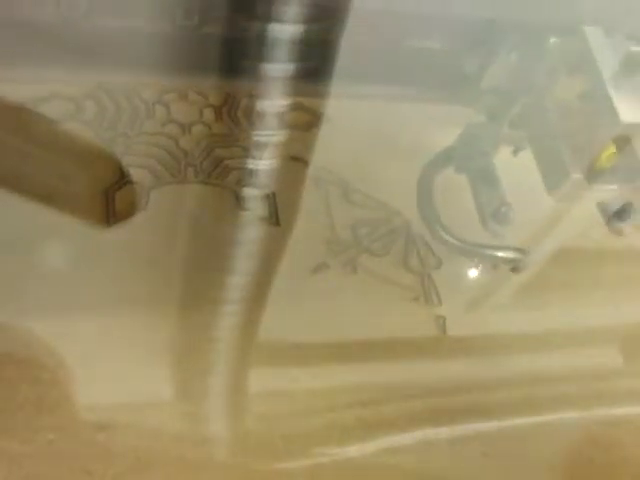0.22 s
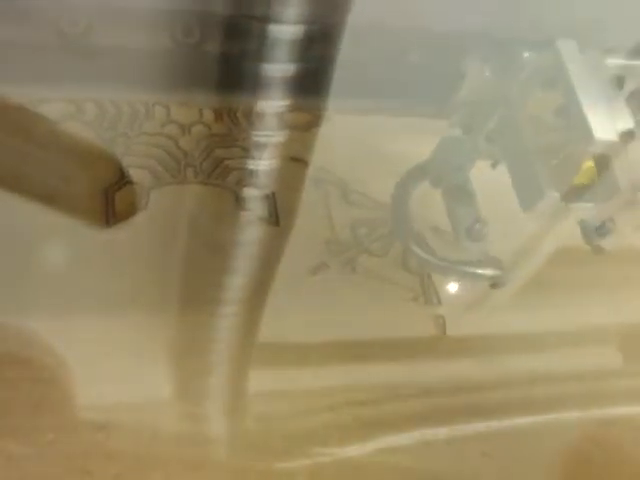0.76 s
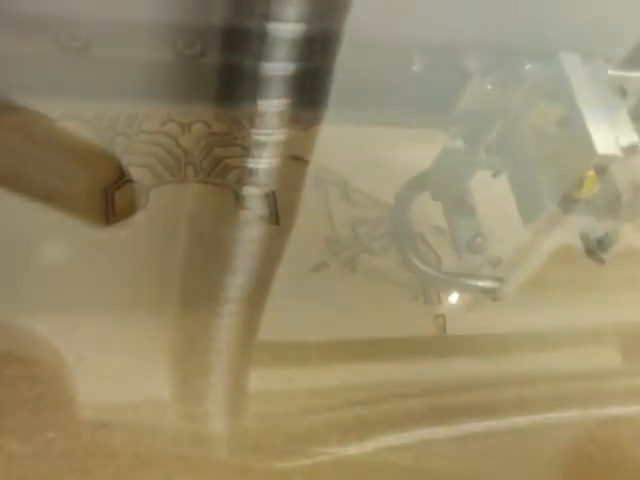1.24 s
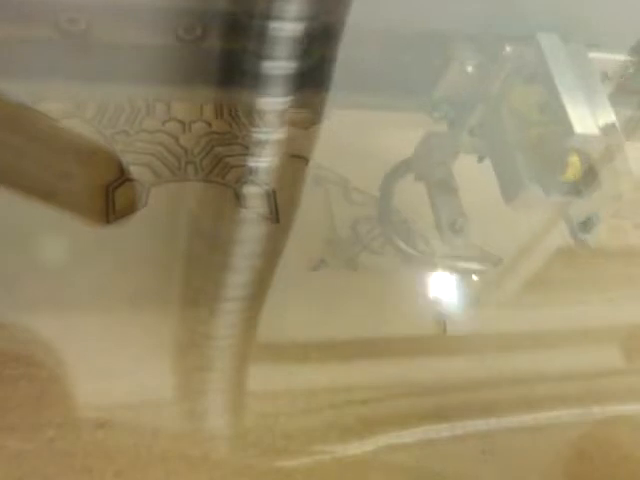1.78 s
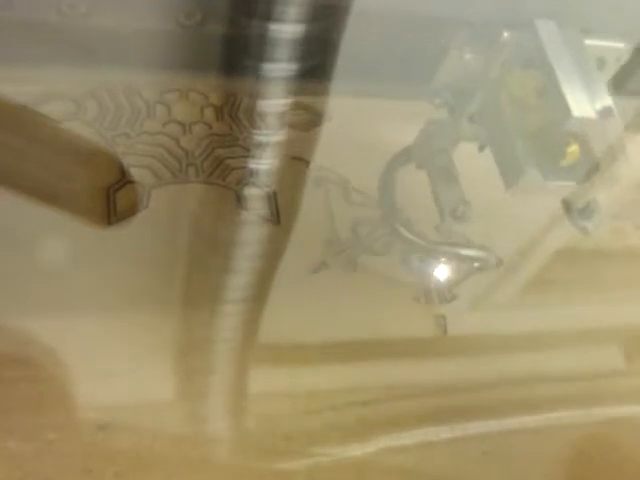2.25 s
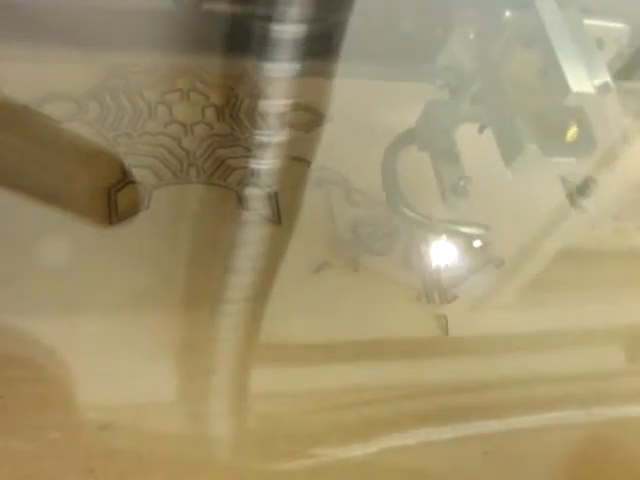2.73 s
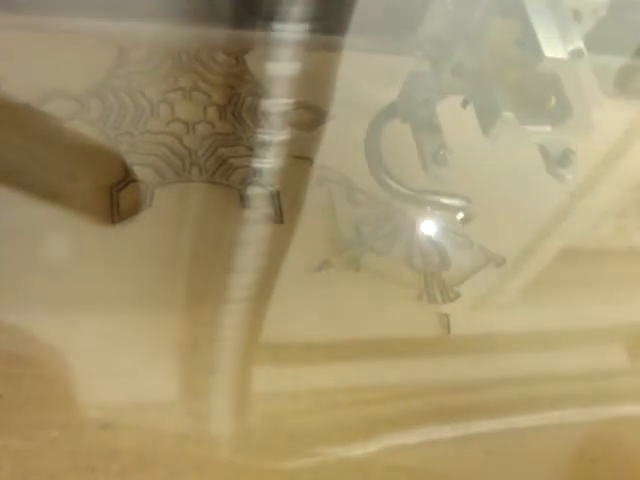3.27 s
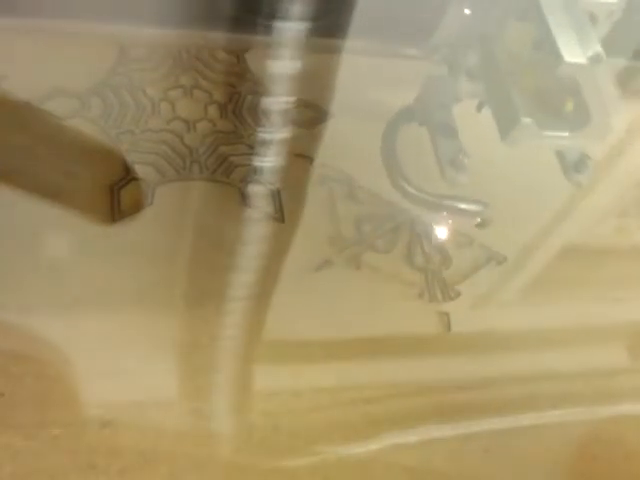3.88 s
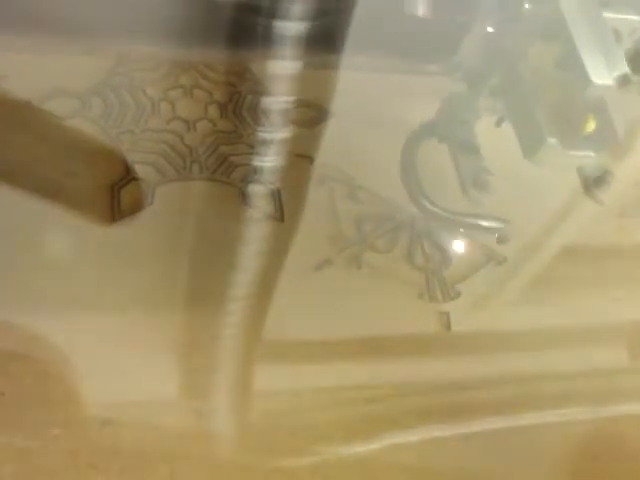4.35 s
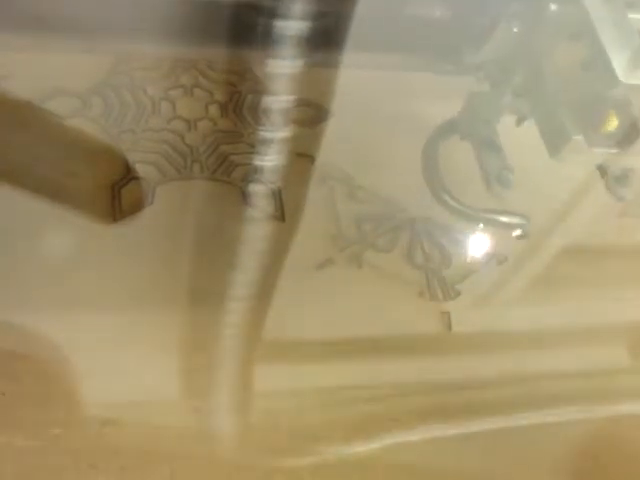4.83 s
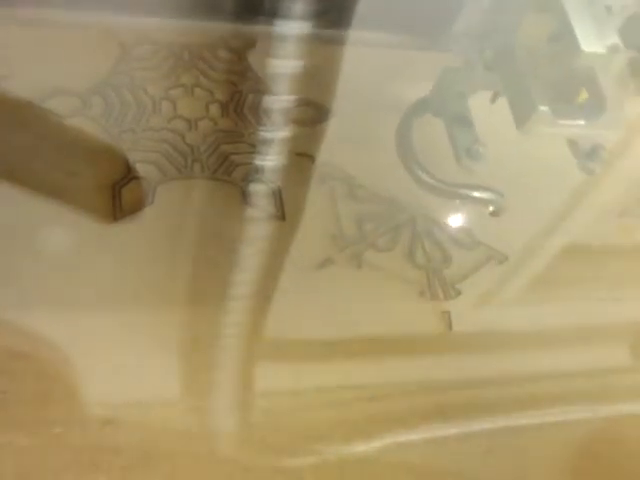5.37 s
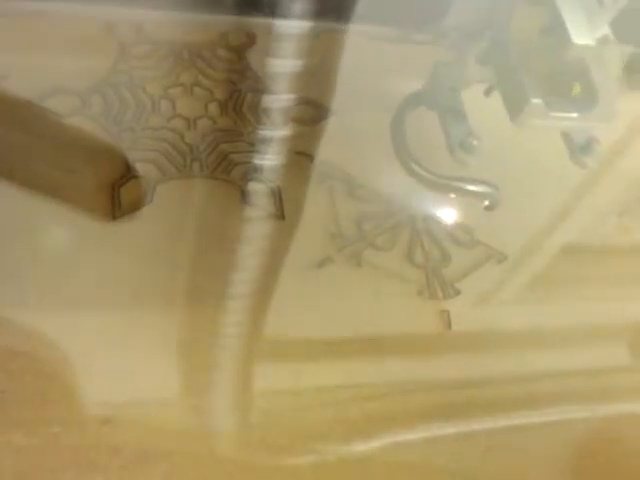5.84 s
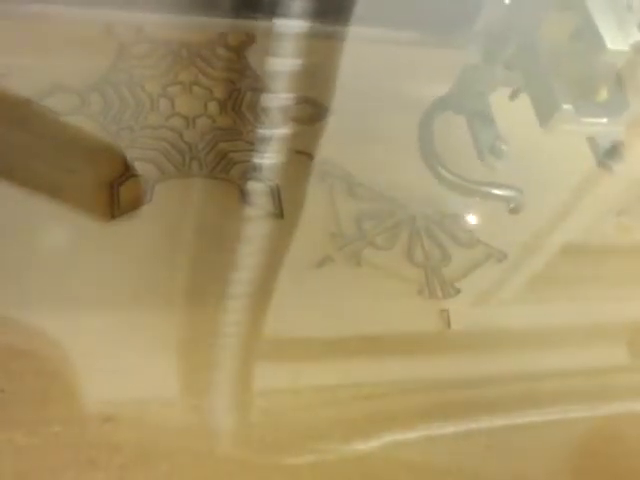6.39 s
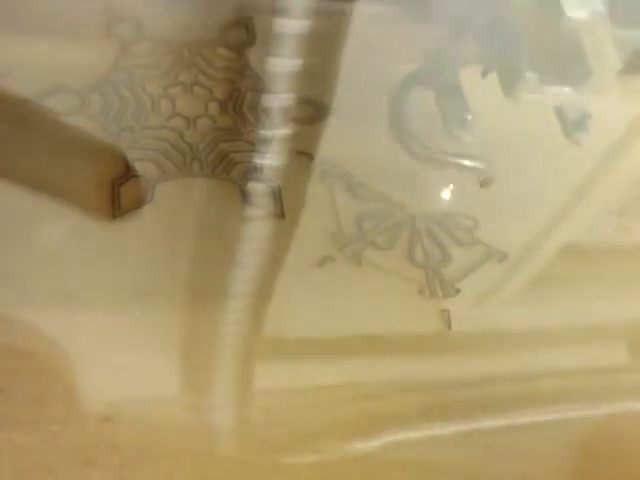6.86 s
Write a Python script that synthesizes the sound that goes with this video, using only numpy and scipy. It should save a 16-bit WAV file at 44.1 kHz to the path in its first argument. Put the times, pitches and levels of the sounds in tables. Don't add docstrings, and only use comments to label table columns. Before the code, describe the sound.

Continuous machine exhaust roar with a hollow hose boom, faint fan whine, brief motor tones and one tiny tick.

```python
import sys
import numpy as np
from scipy import signal
from scipy.fft import rfft, irfft, dct, next_fast_len
from scipy.io import wavfile
from scipy.ndimage import uniform_filter1d, map_coordinates

SR = 44100
rng = np.random.default_rng(int(sys.argv[2]) if len(sys.argv) > 2 else 0)


def level_to_linear(level):
    exponent = np.asarray(level, float) / 20
    return 10 ** exponent


def transcribe(u):
    v = np.clip(np.atleast_2d(u).T, -1, 1)
    q = np.round(v * 32767).astype(np.int16)
    wavfile.write(sys.argv[1], SR, q)


N = 313727

# frequency [Hz], density [dB per Hz].
TURBULENCE = [(15, -50), (25, -38), (180, -18), (301, -14.5), (365, -8.5), (482, -10.5), (623, -7),
              (709, -7), (789, -8.5), (1470, -7), (2680, -6.5), (3180, -8), (4200, -7.5), (5460, -12),
              (9240, -120)]
# centre [Hz], width [Hz], lift [dB].
DUCT_MODES = [(120, 62, 6), (177, 16, -4), (213, 41, 7), (241, 12, -3.5), (604, 10, -5.5), (646, 79, 5),
              (694, 30, 2.5), (718.5, 22, -7), (759, 49, 6), (820, 46, 4.5), (890, 24, 4.5), (941, 31, 4.5),
              (1039, 44, 3), (1283, 120, 2.5), (1360, 55, 0.5), (1792, 80, 3.5), (2700, 92, -2),
              (2930, 250, 3), (3065, 30, 1.5), (3440, 60, 1), (3114, 26, 5.5), (3194, 70, 4),
              (3330, 78, 4.5)]
# centre [Hz], width [Hz], level [dB].
HOSE_MODES = [(255, 24, -11), (287.2, 22, 1.5), (305.4, 7, -5), (313.5, 15, 2.5), (336, 16, -10.5)]
# time [s], level over its mean [dB].
HOSE_SWELL_DB = [(0, -0.5), (.3, 1.5), (.7, -2), (1.3, 0.5), (1.65, -3.5), (2.4, -3), (2.75, 3.5),
                 (3.15, -1), (3.7, 0), (4.3, 0.5), (4.85, 2), (5.2, -3), (5.45, 0), (5.75, 3), (6.1, -2),
                 (6.35, -1), (6.601, 1), (7.11, -1)]
# start [s], end [s], step rate at start [Hz], step rate at end [Hz],
# level of the double [dB].
GANTRY_MOVES = [
    (.06, 1.02, 343, 341.5, -37),
    (1.02, 1.98, 323, 320.5, -39),
    (2.62, 3.02, 322, 318, -37),
    (1.204, 1.472, 240, 238, -46),
    (3.753, 4.7, 266, 264.6, -40.5),
    (5.47, 5.72, 180, 184, -40),
    (6.71, 6.9, 300, 232, -36),
    (6.93, 7.2, 378, 382, -39),
]
# start [s], end [s], step rate at start [Hz], step rate at end [Hz],
# level of the double [dB].
CARRIAGE_MOVES = [(0, .3, 385, 383, -40), (0, .26, 408, 413, -41), (1.572, 1.76, 105.9, 101, -42.5),
                  (1.68, 1.79, 333, 342, -35), (1.72, 2.16, 342, 339.5, -31),
                  (2.08, 2.42, 339.5, 331, -35.5), (2.266, 2.52, 68.3, 68, -51),
                  (4.62, 4.876, 68.6, 65, -54), (4.923, 5.123, 258, 265, -41), (5.26, 5.44, 201, 190, -38),
                  (.5, 1.1, 402, 405, -42), (2.28, 2.62, 398, 417, -40), (3.9, 4.12, 386, 378, -40),
                  (5.88, 6.12, 387, 380, -39)]
ROTOR_RATES_HZ = [619.1, 642.8, 551.3, 580.3, 544.4, 44.8, 2115, 762, 803, 832, 3190]
# (multiple of the #
# base rate, level [dB rms]).
ROTOR_WHINES = [(.09, 1.8, [(1, -39.5), (2, -47), (3, -53), (4, -46), (5, -38.5), (6, -52)]),
                (.17, 3, [(1, -46), (2, -43.5), (3, -45.5), (4, -51), (5, -50)]), (.22, 1.5, [(1, -40.5),
                (4, -50), (6, -50)]), (.08, 4, [(1, -51), (2, -45.5)]), (.1, 4, [(2, -48), (3, -45)]),
                (.9, 4, [(1, -68), (2, -66), (3, -60)]), (.25, 4, [(1, -49)]), (.6, 4, [(1, -46)]),
                (.7, 4, [(1, -44)]), (.5, 5, [(1, -45)]), (.4, 3, [(1, -46)])]
# frequency [Hz], gain [dB].
TREBLE_LOSS = [(4000, 2.5), (4300, 0), (4700, -9.5), (4850, -8), (5150, -14.5), (5270, -15), (5400, -18.5),
               (5550, -19), (5750, -18.5), (5900, -22.5), (6060, -24), (6250, -21.5), (6500, -19.5),
               (6800, -21.5), (6930, -26), (7080, -23.5), (7270, -29.5), (7300, -88)]
# frequency [Hz], step [dB].
COARSE_STEPS = [(60, -50), (1000, -26), (2000, -20), (3500, -18), (4200, -19), (4600, -21), (5000, -24.5),
                (5400, -29), (6000, -32), (6500, -29.5), (7200, -35.5)]
# frequency [Hz], step [dB].
FINER_STEPS = [(60, -55), (500, -30), (3500, -31), (4300, -40), (4900, -47), (5300, -52), (6000, -56.5),
               (7200, -62)]

RUSH_DB, BOOM_DB = -18.6, -35.5
SURGE_DB, SURGE_PER_S = 0.006, 2.5
BOOM_GROWS = 4.6
GANTRY_SIDE_DB, CARRIAGE_SIDE_DB = -10, -21
RAMP_S, STEP_WAVER, HUM_FLUTTER_DB = 0.06, 0.003, 2
COARSE_FRAME, COARSE_LEADS = 2822, (593, 1592)
FINER_FRAME, FINER_LEAD = 1024, 824
STEP_FOLLOWS = 0.6
SPLICE_AT = 77959
HAZE_DB = -94.5


def unit(x):
    return x / np.sqrt(np.mean(x ** 2) + 1e-20)


def along(points, hz):
    f, v = np.transpose(points)
    return np.interp(np.log(hz + 1), np.log(f + 1), v)


def wobble(rate, size=N):
    knots = rng.standard_normal(int(size * rate / SR) + 4)
    return map_coordinates(knots, [np.arange(size) * rate / SR])


def filtered(x, gain):
    m = next_fast_len(N)
    spectrum = rfft(np.resize(x, m))
    return irfft(spectrum * gain(np.fft.rfftfreq(m, 1 / SR)), m)[:N]


def bell(hz, centre_hz, width_hz):
    return 1 / (1 + (2 * (hz - centre_hz) / width_hz) ** 2)


def eddies(patchy_db):
    z = signal.stft(rng.standard_normal(N), nperseg=512)[2]
    field = uniform_filter1d(rng.standard_normal(z.shape), 6, 0)
    field = uniform_filter1d(field, 14, 1)
    return signal.istft(z * level_to_linear(patchy_db * unit(field)), nperseg=512)[1][:N]


def duct_rush(surge_db):
    def duct_gain(hz):
        lift_db = sum(db * bell(hz, centre, width) for centre, width, db in DUCT_MODES)
        return level_to_linear(along(TURBULENCE[:-2], hz) + lift_db)

    return level_to_linear(RUSH_DB + surge_db) * unit(filtered(eddies(patchy_db=0.23), duct_gain))


def hose_boom(surge_db):
    def hose_gain(hz):
        return sum(level_to_linear(db) * bell(hz, centre, width) for centre, width, db in HOSE_MODES)

    boom = unit(filtered(rng.standard_normal(N), hose_gain))
    swell_db = np.interp(np.arange(N) / SR, *np.transpose(HOSE_SWELL_DB))
    return level_to_linear(BOOM_DB + swell_db + BOOM_GROWS * surge_db) * boom


def exhaust_air():
    surge_db = SURGE_DB * wobble(SURGE_PER_S)
    return duct_rush(surge_db) + hose_boom(surge_db)


def cutting_head():
    out = np.zeros(N)
    for moves, side_db in ((GANTRY_MOVES, GANTRY_SIDE_DB), (CARRIAGE_MOVES, CARRIAGE_SIDE_DB)):
        for start, end, first_hz, last_hz, double_db in moves:
            span = slice(round(start * SR), min(round(end * SR), N))
            t = np.arange(N)[span] / SR
            ramp = np.clip(np.minimum(t - start, end - t) / RAMP_S, 0, 1)
            step_hz = np.interp(t, [start, end], [first_hz, last_hz])
            step_hz = step_hz * (1 + STEP_WAVER * wobble(9.5, size=len(t)))
            phase = 2 * np.pi * np.cumsum(step_hz) / SR
            note = np.sin(2 * phase) + level_to_linear(side_db) * (np.sin(phase) + np.sin(3 * phase))
            level = level_to_linear(double_db + HUM_FLUTTER_DB * wobble(12, size=len(t)))
            out[span] += ramp * level * note
    return np.sqrt(2) * out


def rotors():
    out = np.zeros(N)
    for hz, (drift_percent, flutter_db, orders) in zip(ROTOR_RATES_HZ, ROTOR_WHINES):
        base_hz = hz * (1 + drift_percent / 100 * wobble(4.5))
        phase = 2 * np.pi * np.cumsum(base_hz) / SR
        for order, db in orders:
            flutter = unit(level_to_linear(flutter_db * wobble(7.5)))
            out += level_to_linear(db) * flutter * np.sin(round(order) * phase + 2 * np.pi * rng.random())
    return np.sqrt(2) * out


def scene():
    return (exhaust_air() + cutting_head() + rotors())[None]


def stream_rounding(x, steps, frame, lead, size, scatter_db):
    count = N // frame + 3
    window = signal.windows.kaiser_bessel_derived(2 * frame, 4 * np.pi)
    padded = np.pad(x, (frame + lead, count * frame - N - lead), "wrap").reshape(-1, frame)
    a, b, c, d = np.split(np.hstack([padded[:-1], padded[1:]]) * window, 4, axis=1)
    lines = dct(np.hstack([-c[:, ::-1] - d, a - b[:, ::-1]]), type=4, norm="ortho")
    chance = np.repeat(rng.standard_normal((count, frame // size)), size, axis=1)
    step = level_to_linear(along(steps, np.arange(frame) * SR / 2 / frame) + scatter_db * chance)
    band_rms = np.sqrt((lines.reshape(count, -1, size) ** 2).mean(2))
    band = np.repeat(band_rms, size, axis=1) + 1e-12
    step = step * np.maximum(band / band.mean(0), 0.3) ** STEP_FOLLOWS
    lines = np.sign(lines) * np.floor(abs(lines) / step + 0.4) * step
    u, v = np.split(dct(lines, type=4, norm="ortho"), 2, axis=1)
    frames = np.hstack([v, -v[:, ::-1], -u[:, ::-1], -u]) * window
    return (frames[:-1, frame:] + frames[1:, :frame]).ravel()[lead:][:N]


def splice_tick():
    jump = level_to_linear(-18.5) * np.exp(-np.arange(40) / 2.5)
    return np.pad(jump, (SPLICE_AT, N - SPLICE_AT - len(jump)))


def low_pass(x):
    return signal.sosfilt(signal.butter(12, 15700, fs=SR, output="sos"), x)


def record(dry):
    dull = filtered(dry[0], lambda hz: level_to_linear(along(TREBLE_LOSS, hz)))
    before, after = (stream_rounding(dull, COARSE_STEPS, COARSE_FRAME, lead, size=34, scatter_db=1.3)
                     for lead in COARSE_LEADS)
    heard = np.where(np.arange(N) < SPLICE_AT, before, after)
    heard = stream_rounding(heard, FINER_STEPS, FINER_FRAME, FINER_LEAD, size=16, scatter_db=1)
    heard = heard + level_to_linear(HAZE_DB) * rng.standard_normal(N)
    heard = heard + splice_tick()
    heard = heard * np.minimum(np.arange(N)[::-1] / 60, 1)
    return low_pass(heard[None])


dry = scene()
out = record(dry)
transcribe(out)
```